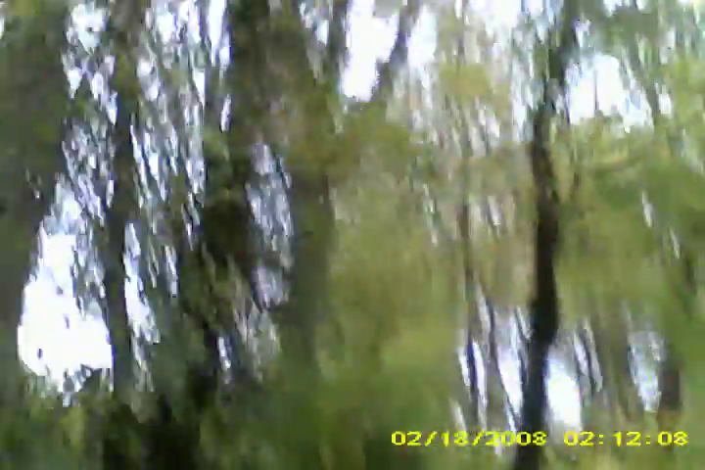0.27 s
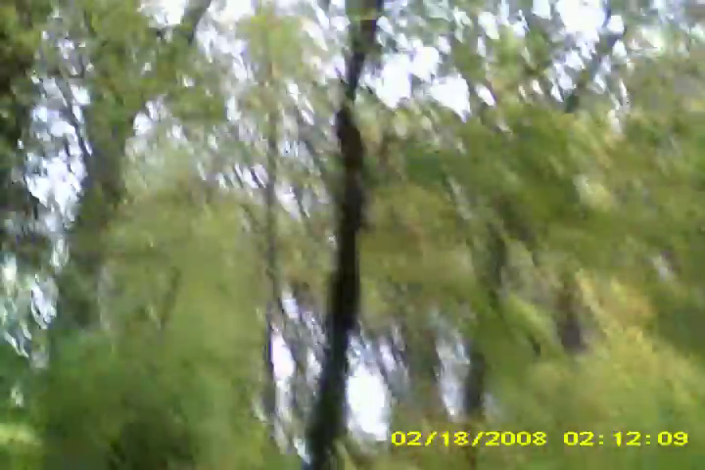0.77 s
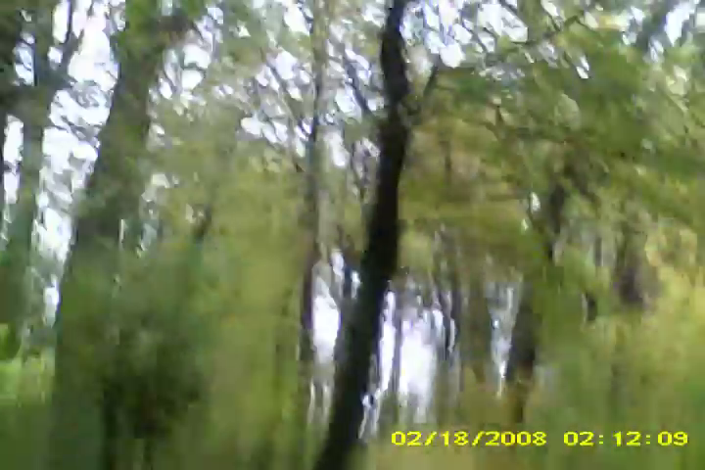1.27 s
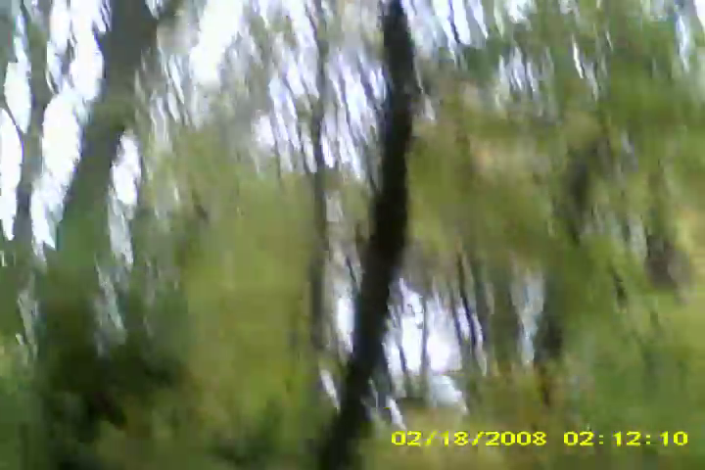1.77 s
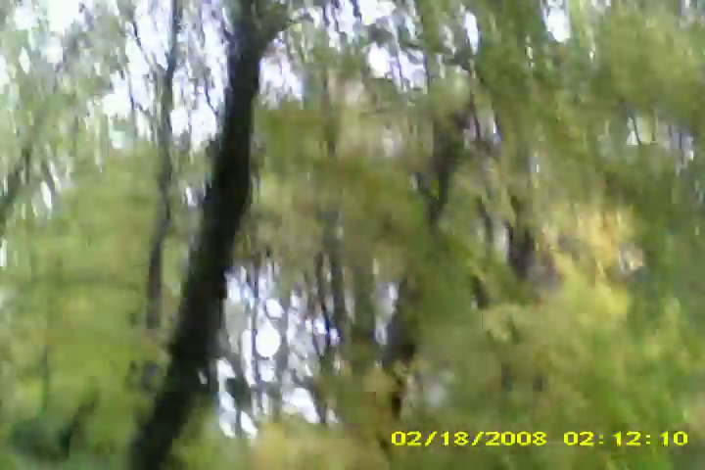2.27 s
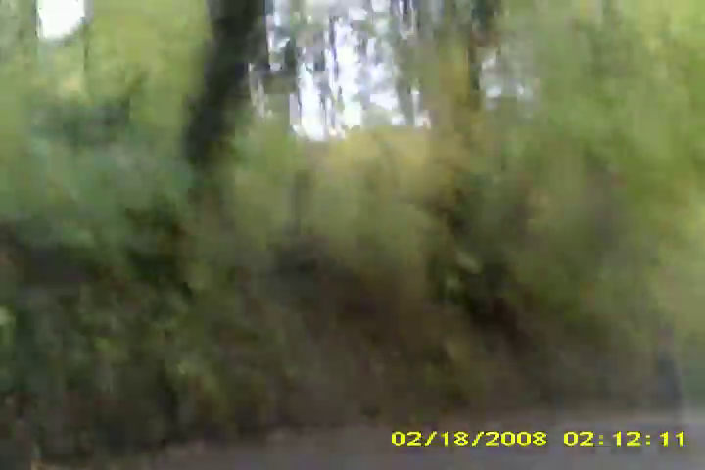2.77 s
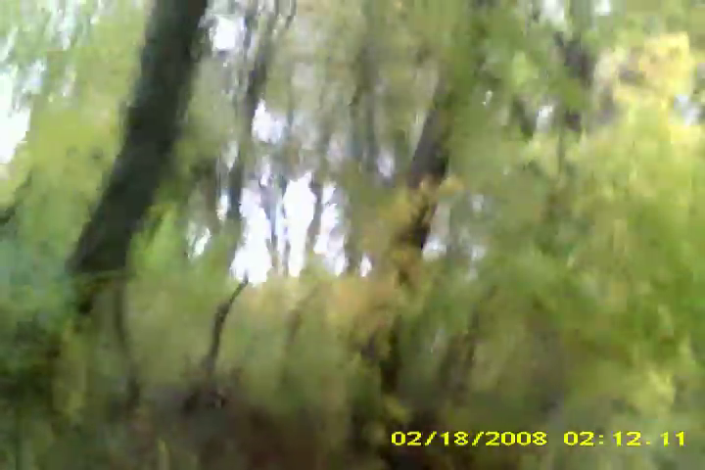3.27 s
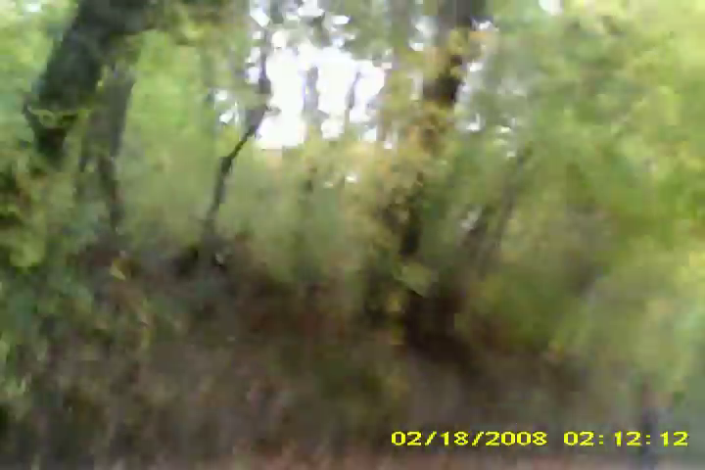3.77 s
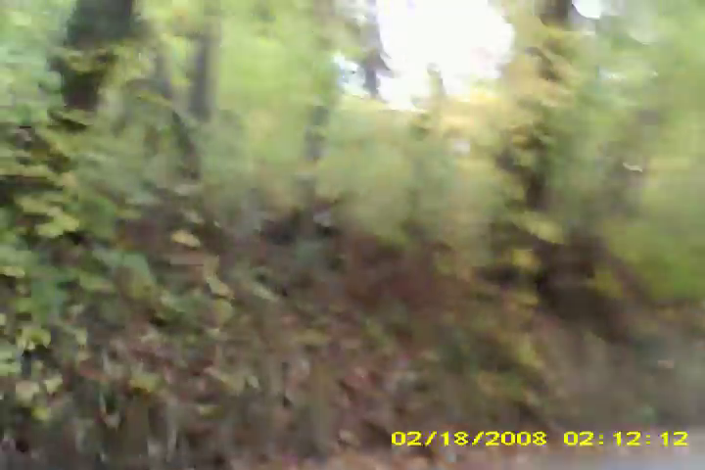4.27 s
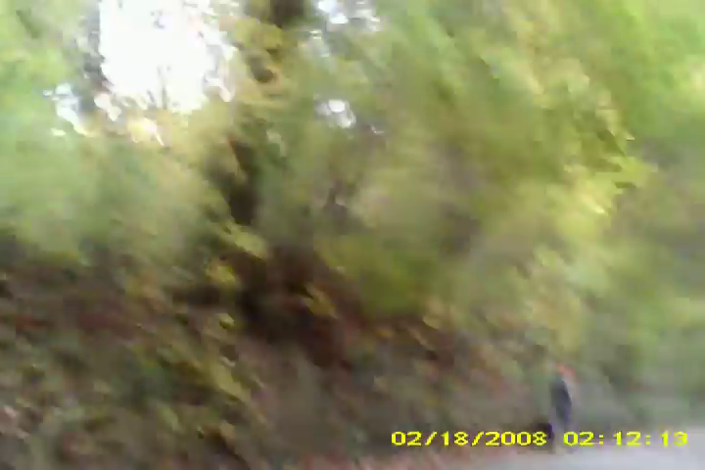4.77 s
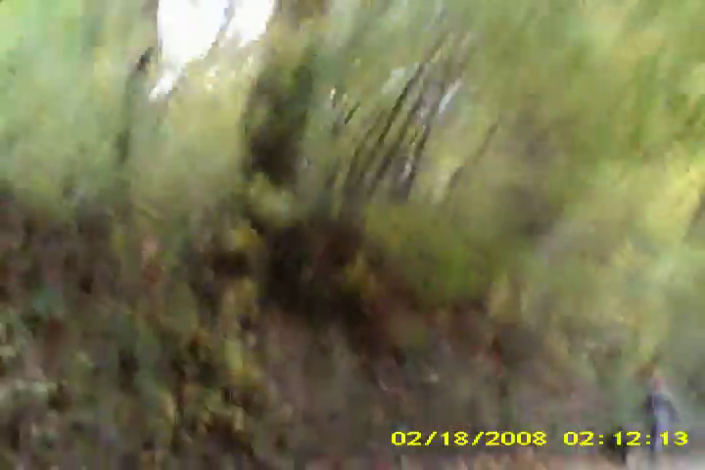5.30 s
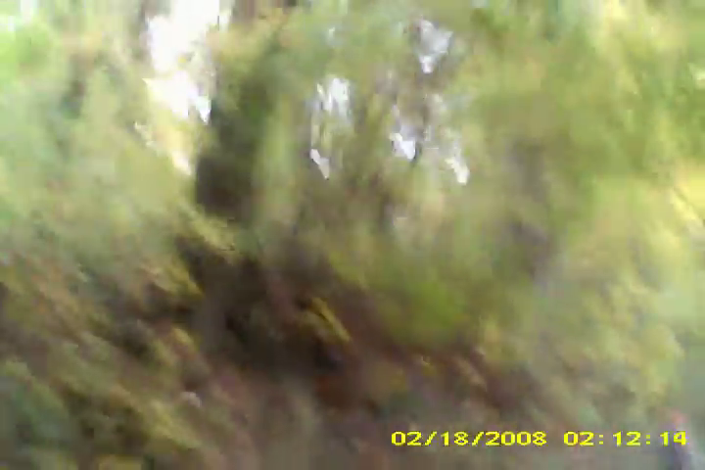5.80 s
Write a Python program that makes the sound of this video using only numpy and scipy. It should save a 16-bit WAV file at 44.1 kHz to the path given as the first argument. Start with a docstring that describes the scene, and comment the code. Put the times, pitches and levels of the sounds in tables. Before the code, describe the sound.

A mountain bike rolls over a bumpy forest path for about six seconds, heard in mono from a small camera fixed to it. Hard, dry plastic knocks start at once and crowd the first half second, ease slightly until 0.8, then return in quick uneven clusters through 1.0 to 1.75. After a thinner moment near 2.1 with ticks and gritty rattling, they are densest from 2.3 to 3.0. From 3.0 to 4.4 blows are sparser, with a pair near 3.7, brief faint brake whines at 3.7 and 4.0, a sharp rattle at 3.9 and tiny metal clinks. Knocks gather again from 4.5, busy around 4.9 to 5.3, then continue scattered to the end. Throughout, loose parts chatter softly, the frame thumps dully, tyres rush with a grainy flutter and wind rumbles low. The knocks are boxy, clipped and close, with little echo.

```python
"""Hard, bright knocks come thick and fast, with ticks, clinks and soft chatter between them.
Under them lie the rush of tyres, brief hums and whines, and the rumble of wind.
A mountain bike rolls down a bumpy forest path with a small camera fixed to it.
The knocks, taps and rattles are short pushes that set decaying sines ringing; the hums are sines.
Tyres and wind are noise in bands, and the camera's housing colours the whole mix."""
import sys
import numpy as np
from scipy import signal
from scipy.io import wavfile

SR = 44100
rng = np.random.default_rng(int(sys.argv[2]) if len(sys.argv) > 2 else 0)


def materialize(psi):
    """Save the field psi as 16-bit PCM at rate SR to the path in sys.argv[1].

    A 1-D psi becomes a single channel; in a 2-D psi each row is a channel.
    """
    bounded = np.clip(np.atleast_2d(psi).T, -1, 1)
    quanta = np.round(bounded * 32767).astype(np.int16)
    wavfile.write(sys.argv[1], SR, quanta)


N = 266364
TIME = np.arange(N) / SR   # seconds
BLOW_S = np.arange(round(.05 * SR)) / SR   # time inside a single blow, in seconds

# Knocks of the plastic mount.
# Each row: start of the main contact in seconds, nominal length in ms, level in dB before the band shares.
MOUNT_KNOCKS = [(0.0192, 6.8, -15.5), (0.0303, 8.7, -11.5), (0.1344, 6.15, -12.5), (0.2334, 7.1, -11.0),
                (0.2575, 1.2, -18.5), (0.3254, 1.68, -7), (0.338, 8, -12), (0.3725, 3.2, -14.5),
                (0.4173, 13.7, -15), (0.4767, 6.65, -13), (0.5, 8.2, -19.5), (0.7096, 5.7, -21),
                (0.7916, 4.5, -17), (0.8621, 5.7, -11), (0.8805, 6.4, -11), (0.9143, 1.8, -12.5),
                (0.9203, 4.4, -15.5), (0.9314, 4.2, -16.5), (0.9543, 3.8, -12), (1.0108, 1.93, -13),
                (1.194, 7.6, -13), (1.2985, 1.2, -11), (1.339, 5.9, -11.5), (1.35, 3.7, -11.5),
                (1.4269, 3.46, -13), (1.4672, 2.6, -15.5), (1.4999, 3.4, -15.5), (1.5639, 4, -12.5),
                (1.589, 3.5, -10.0), (1.602, 11.3, -12.5), (1.665, 2.65, -16), (1.675, 3.6, -10.5),
                (1.6967, 4.4, -14), (1.7452, 7.6, -15), (1.9129, 7.4, -16.5), (1.9259, 6.6, -11.5),
                (1.9806, 6, -13), (1.9933, 8.3, -13), (2.0579, 9.6, -18), (2.3097, 3.9, -11.5),
                (2.3178, 11.5, -12.5), (2.4017, 4.3, -13), (2.414, 5.8, -11), (2.4257, 11.5, -14),
                (2.4645, 11, -16), (2.4907, 2.54, -16.5), (2.498, 2.65, -9.5), (2.5143, 6.5, -14.5),
                (2.572, 1.35, -17), (2.593, 10.3, -12), (2.635, 3.26, -10), (2.6532, 10.6, -12.5),
                (2.7166, 4.3, -19), (2.7723, 8.6, -13), (2.8536, 6.2, -10.3), (2.9004, 6.7, -16),
                (2.9125, 10.9, -13), (2.9943, 3, -13.5), (3.2159, 7.2, -14.5), (3.2622, 2.8, -13),
                (3.667, 6.9, -13.5), (3.6836, 14.3, -12.5), (3.7204, 8.8, -19), (3.746, 7.2, -21.5),
                (4.0284, 3.55, -16.5), (4.0979, 12.7, -13), (4.328, 3.4, -25), (4.4597, 2, -17),
                (4.4838, 11.4, -15.5), (4.582, 4.45, -11.7), (4.8702, 6.1, -19), (4.8797, 3.56, -11.5),
                (4.916, 4.4, -14.5), (4.9591, 2.6, -14.5), (4.9831, 4.7, -14), (4.998, 7.1, -10.5),
                (5.0277, 6.3, -14), (5.13, 5.1, -22), (5.139, 7.86, -12), (5.2175, 8.5, -12.5),
                (5.2847, 4.3, -22), (5.3911, 2.7, -12.5), (5.524, 5.47, -15), (5.702, 7.6, -19.5),
                (5.7138, 7.9, -11.5), (5.7527, 6.9, -13.5), (5.7815, 9.1, -15.5), (5.942, 9.8, -14.5),
                (6.0287, 3.2, -18)]
# Light taps of chain and cables.
# Each row: start of the main contact in seconds, level in dB before the band shares.
CABLE_TICKS = [(0.2932, -18.4), (0.3033, -21), (0.3608, -13), (1.0787, -21), (1.113, -12.5), (1.131, -22.5),
               (1.257, -22), (1.28, -13), (1.32, -17), (1.484, -18.7), (1.5473, -14.5), (1.7812, -16.5),
               (1.8735, -17), (1.946, -19.5), (2.045, -16), (2.193, -19), (2.2159, -19.4), (2.244, -19.0),
               (2.5416, -19.5), (2.9834, -17.5), (3.0259, -12), (3.2873, -25), (3.2976, -24), (3.3366, -22),
               (3.6383, -18), (3.6509, -15), (3.8588, -15), (3.936, -16), (4.2054, -22), (4.4293, -13.5),
               (4.4455, -23), (4.557, -12.7), (4.6076, -21), (4.94, -16), (5.165, -22.5), (5.2641, -21)]
# Small bright clinks of metal. Each row: start in seconds, level in dB that the ring levels are added to.
METAL_CLINKS = [(2.635, -19), (3.3358, -22.5), (3.671, -22), (3.9228, -23), (4.011, -19), (4.187, -31.5),
                (4.341, -36)]
# Roughness of the ground, heard as the chatter of loose parts.
# Each row: time in seconds, roughness in dB (a relative scale).
GROUND_SHAKE = [(0.0, -38.5), (0.37, -32.5), (0.62, -38.5), (1.14, -37), (1.5, -35.5), (1.93, -31.5),
                (2.25, -35), (2.47, -31.5), (3.5, -40.5), (3.9, -30), (4.22, -41), (4.58, -32.5),
                (4.74, -34.5), (5.08, -34.5), (5.5, -33.5), (6.04, -40.5)]
# Gritty bursts of rattling. Each row: middle in seconds, nominal length in ms, relative level in dB.
RATTLE_BURSTS = [(0.4, 41, -30.5), (1.269, 16, -34.5), (1.354, 28, -30), (2.023, 21, -34),
                 (2.115, 9.6, -29.5), (2.435, 17.3, -24), (2.651, 69, -30), (2.764, 42, -40),
                 (2.873, 26, -29), (3.105, 53, -39.5), (3.701, 42, -38), (3.892, 13.3, -23.5),
                 (3.962, 52, -38.5), (4.376, 6.4, -31), (4.506, 27, -30), (4.58, 20, -34),
                 (4.768, 28, -39.5), (4.937, 31, -38), (5.27, 15, -33), (5.339, 17, -31.5),
                 (5.399, 26, -35), (5.659, 33, -31.5)]
# Brief hums of the tyre tread and faint brake whines.
# Each row: middle in seconds, length in seconds, average pitch in Hz, peak level in dB.
HUMS_AND_WHINES = [(1.014, 0.24, 108.4, -40), (2.994, 0.12, 171.5, -35.5), (3.737, 0.045, 1203, -25.5),
                   (3.967, 0.13, 1200, -32.5), (4.254, 0.092, 128.5, -39.5)]
# Strength of the wind on the microphone. Each row: time in seconds, level in dB.
WIND_STRENGTH = [(0, -38), (.4, -37.5), (1.1, -38), (2.4, -39), (3.2, -40.5), (4.5, -42.5), (5.0, -38.5),
                 (6.04, -41.5)]
# Ring of the mount. Each row: central pitch in Hz, relative level in dB,
# nominal time in seconds to fade by 60 dB.
MOUNT_RING = [(333, -42, 0.0021), (626, -17, 0.012), (751, -10, 0.027), (1020, 3.5, 0.015),
              (1305, -2, 0.015), (1716, -2, 0.018), (2010, 0, 0.01), (2743, 2, 0.012), (3144, -0.5, 0.009),
              (3962, 4.5, 0.0083), (4280, -21, 0.019), (5410, -9, 0.013), (6680, -14, 0.013)]
# Ring of the loose parts. Each row: central pitch in Hz, relative level in dB,
# nominal time in seconds to fade by 60 dB.
PARTS_RING = [(1300, -27, 0.0035), (1678, 1.5, 0.014), (1823, 5.5, 0.018), (2087, 7, 0.0091),
              (2596, -7.5, 0.032), (3740, -2.5, 0.014), (3940, 1.5, 0.0064), (5940, -36, 0.0061),
              (6730, -58.5, .010), (9500, -43, .004)]
# Ring of the clinking metal. Each row: pitch in Hz, relative level in dB,
# time in seconds to fade by 60 dB.
METAL_RING = [(6770, -3.5, 0.0045), (7040, -20, 0.015), (9500, -32.5, .007)]
# Tone colour of the tyre rush. Each row: frequency in Hz, relative level in dB per Hz.
TYRE_SPECTRUM = [(110, -6), (220, -8.5), (350, -3.5), (550, -2.5), (1000, -3.5), (1700, -1), (2400, -11),
                 (3300, -24), (4000, -39), (5200, -64), (7200, -40), (10000, -60)]
# Tone colour of the wind. Each row: frequency in Hz, relative level in dB per Hz.
WIND_SPECTRUM = [(20, 11.5), (35, -18.5), (60, -3.5), (120, -5.5), (200, -12.5), (400, -21), (1500, -75)]

LEAD_S = .005   # seconds allowed for the light graze that comes before a blow
CRACK_FROM_HZ = 2585   # the crack lies above this, the clack below
# Thud and clack are steady shares of a knock (dB).
THUD_DB, CLACK_DB = -3.5, -1
# A reference knock: length (ms), level (dB), share of its crack (dB).
KNOCK_MS, KNOCK_DB, CRACK_DB = 5.7, -9.5, -11.0
# Harder knocks crack more: dB per doubling of length, dB per dB of level.
CRACK_DB_PER_DOUBLING, CRACK_DB_PER_DB = 5, 1.53
# Every tap: nominal length (ms), shares of its clack and its crack (dB).
TICK_MS, TICK_CLACK_DB, TICK_CRACK_DB = 3.0, 0, -15
# Thump of the frame: pitch (Hz), fade by 60 dB (s), undamped height under a reference knock (dB).
FRAME_HZ, FRAME_T60_S, FRAME_DB = 85, 0.044, -33.5
JOG_DB = -11   # loose parts jogged by a clink, relative to the clink
CHATTER_DB = -1.5   # chatter relative to the roughness curve
# The camera: housing resonance, its own whine, upper limit of the sound (Hz).
HOUSING_HZ, WHINE_HZ, CUTOFF_HZ = 6580, 7400, 10900


def mount():
    """Hard knocks ring the mount and overload the microphone, which flattens them; harder is brighter."""
    s, ms, level_db = np.transpose(MOUNT_KNOCKS)
    blows = bounces(ms * .85, MOUNT_RING, graze=0.041, rebound=0.5, scatter_db=6.5, detune=0.043, count=11)
    # longer knocks are the harder ones, so they are flattened more
    blows = np.tanh(blows * (1 + 0.014 * ms[:, None]))
    hardness_db = CRACK_DB_PER_DOUBLING * np.log2(ms / KNOCK_MS)
    hardness_db = hardness_db + CRACK_DB_PER_DB * (level_db - KNOCK_DB)
    low_part = cut(cut(blows, 1348, "low", order=4), 204, "high", order=1)
    thud = at_level(low_part, ms, level_db + THUD_DB)
    clack = at_level(clack_of(blows), ms, level_db + CLACK_DB)
    crack = at_level(crack_of(blows), ms, level_db + CRACK_DB + hardness_db)
    return played(s - LEAD_S, thud + clack + crack)


def frame():
    """Each knock shoves the frame, which gives a short, deep thump; long, loud knocks shove most."""
    s, ms, level_db = np.transpose(MOUNT_KNOCKS)
    shove = ms / KNOCK_MS * from_db(level_db - KNOCK_DB + FRAME_DB)
    return ring(played(s, shove[:, None]), FRAME_HZ, FRAME_T60_S)


def ticks():
    """Light taps of chain and cables ring only the loose parts and have no thud."""
    s, level_db = np.transpose(CABLE_TICKS)
    ms = np.full(len(s), TICK_MS)
    blows = bounces(ms * 0.55, PARTS_RING, graze=0.12, rebound=0.35, scatter_db=6.5, detune=0.037, count=5)
    clack = at_level(clack_of(blows), ms, level_db + TICK_CLACK_DB)
    crack = at_level(crack_of(blows), ms, level_db + TICK_CRACK_DB)
    return played(s - LEAD_S, clack + crack)


def clinks():
    """Metal touches metal and jogs the loose parts; every ring gets a strength of its own."""
    s, clink_db = np.transpose(METAL_CLINKS)
    jogged = [(hz, level_db + JOG_DB, t60) for hz, level_db, t60 in PARTS_RING]
    out = np.zeros(N)
    for hz, level_db, t60 in list(METAL_RING) + jogged:
        strength = from_db(clink_db + level_db + rng.normal(0, 3.6, len(s)))
        out += ring(played(s, strength[:, None]), hz, t60)
    return out


def crunches():
    """Now and then the loose parts break into a dense, bright buzz made of many tiny contacts."""
    bursts = sum(from_db(db) * swell(s, ms * 1.08 / 1000) for s, ms, db in RATTLE_BURSTS)
    buzz = grains(2200, PARTS_RING, spread_db=29.5)
    buzz = cut(cut(buzz, 500, "high"), 4640, "low")
    return from_db(8.5) * bursts * buzz


def chatter(shake_db):
    """Loose parts and mount tap softly at random, louder on rough ground."""
    parts_taps = grains(110, PARTS_RING, spread_db=17.5)
    mount_taps = grains(70, MOUNT_RING, spread_db=20.0)
    taps = parts_taps + from_db(-2.0) * mount_taps
    soft = cut(cut(taps, 530, "high"), 2800, "low", order=4)
    return from_db(shake_db + CHATTER_DB) * soft


def tyres(shake_db):
    """Tread rushes over grit as fluttering noise, swelling a little with the roughness of the ground."""
    swell_db = 0.15 * (shake_db - np.mean(shake_db))
    return from_db(-36.5 + swell_db) * banded_noise(TYRE_SPECTRUM, patchy_db=2.5, flutter=70)


def tones():
    """Short hums and whines are sines of wavering pitch that swell and fade."""
    out = np.zeros(N)
    for s, length_s, hz, level_db in HUMS_AND_WHINES:
        pitch = hz * (1 + 0.005 * drift(41))
        tone = np.sin(2 * np.pi * np.cumsum(pitch) / SR)
        out += from_db(level_db) * swell(s, length_s) * tone
    return out


def wind():
    """Air pushing at the microphone port makes a lumpy rumble of low noise."""
    return from_db(in_time(WIND_STRENGTH)) * banded_noise(WIND_SPECTRUM, patchy_db=0.9, flutter=11)


def bounces(length_ms, modes, graze, rebound, scatter_db, detune, count):
    """One row per blow: a light graze, the main contact and rebounds ring the modes; peak 1."""
    blows = len(length_ms)
    length = np.asarray(length_ms) * SR / 1000   # in samples
    share = (np.arange(count) - 1 + rng.random((blows, count))) / (count - 1)
    delay = share * length[:, None]
    force = rebound * rng.choice([-1, 1], (blows, count))
    force *= np.sqrt(length / length.max())[:, None]   # shorter blows rebound less
    # the first contact is the graze, the second is the main one
    delay[:, 0], force[:, 0] = -LEAD_S * SR * rng.random(blows), graze
    delay[:, 1], force[:, 1] = 0, 1
    at = np.clip(LEAD_S * SR + delay, 0, len(BLOW_S) - 1).astype(int)
    freedom = (length / length.mean()) ** 0.19   # short blows also die sooner
    rows = np.arange(blows)[:, None]
    out = np.zeros((blows, len(BLOW_S)))
    for hz, level_db, t60 in modes:
        clicks = np.zeros_like(out)
        strength = from_db(level_db + scatter_db * rng.standard_normal(at.shape))
        np.add.at(clicks, (rows, at), force * strength)
        # the pitch shifts a little with how the parts are seated
        pitches = hz * np.exp(detune * rng.standard_normal(blows))
        out += [ring(row, pitch, t60 * free) for row, pitch, free in zip(clicks, pitches, freedom)]
    return -out / np.abs(out).max(axis=1, keepdims=True)


def clack_of(blows):
    """The middle band of each blow."""
    return cut(blows, [1400, CRACK_FROM_HZ], "band")


def crack_of(blows):
    """The bright top of each blow; the graze before it is too soft to crack."""
    return cut(blows, CRACK_FROM_HZ, "high", order=4) * (BLOW_S >= LEAD_S)


def at_level(blows, length_ms, level_db):
    """Scale each blow so that its energy, spread over its nominal length, has this rms level."""
    power = np.sum(blows ** 2, axis=1) / (length_ms * SR / 1000)
    gain = from_db(level_db) / np.sqrt(np.abs(power) + 1e-20)
    return blows * gain[:, None]


def played(times, blows):
    """Lay the blows out in time."""
    out = np.zeros(N)
    for s, blow in zip(times, blows):
        add(out, s, blow)
    return out


def add(out, s, sound):
    """Mix a sound in at time s."""
    i = max(round(s * SR), 0)
    out[i:i + len(sound)] += sound[:N - i]


def grains(per_s, modes, spread_db):
    """Random contacts of uneven size ring the modes; rms 1."""
    clicks = (rng.random(N) < per_s / SR) * from_db(spread_db * rng.random(N))
    out = np.zeros(N)
    for hz, level_db, t60 in modes:
        # each contact pushes each mode with its own random strength
        out += ring(clicks * rng.standard_normal(N), hz, t60) * from_db(level_db)
    return rms_one(out)


def ring(clicks, hz, t60):
    """A unit click starts a decaying sine, of height 1 before the decay; t60 is its fade by 60 dB."""
    r, w = from_db(-60 / (t60 * SR)), 2 * np.pi * hz / SR
    return signal.lfilter([0, np.sin(w)], [1, -2 * r * np.cos(w), r * r], clicks + 1e-18)


def banded_noise(spectrum, patchy_db, flutter):
    """Half-octave bands of noise, which flutter partly together and partly alone; rms 1."""
    edges = 15 * 2 ** np.arange(0, 10.1, .5)   # Hz
    together = drift(flutter)
    white = rng.standard_normal((2, N))   # neighbouring bands use different noise
    points_hz, points_db = np.transpose(spectrum)
    out = np.zeros(N)
    for k, (low, high) in enumerate(zip(edges, edges[1:])):
        # band middle and table points are both compared as log frequency,
        # so every band reads the level at its own pitch
        level_db = np.interp(np.log(low * high) / 2, np.log(points_hz), points_db)
        level_db = level_db + patchy_db * (together + drift(flutter))
        out += cut(white[k % 2], [low, high], "band") * from_db(level_db)
    return rms_one(out)


def drift(rate):
    """A random wandering curve of rms 1, with this many random points per second."""
    knots = rng.standard_normal(int(rate * N / SR) + 2)
    return rms_one(np.interp(TIME * rate, np.arange(len(knots)), knots))


def swell(middle_s, length_s):
    """A single smooth hump of height 1."""
    return np.cos(np.pi * np.clip((TIME - middle_s) / length_s, -.5, .5))


def in_time(rows):
    """A curve joined by straight lines."""
    return np.interp(TIME, *np.transpose(rows))


def cut(x, hz, kind, order=2):
    """Keep the low, high or middle part of a sound with a Butterworth filter."""
    return signal.sosfilt(signal.butter(order, hz, kind, fs=SR, output="sos"), x)


def from_db(db):
    """Turn decibels into a plain factor."""
    return 10 ** (np.asarray(db) / 20)


def rms_one(x):
    """Scale a signal to rms 1."""
    return x / np.sqrt(np.mean(x ** 2) + 1e-20)


def scene():
    """Mix all the sources, as one channel."""
    shake_db = in_time(GROUND_SHAKE)
    rattles = mount() + frame() + ticks() + clinks() + crunches() + chatter(shake_db)
    background = tyres(shake_db) + tones() + wind()
    return (rattles + background)[None]


def record(dry):
    """The camera adds a housing resonance and a faint whine, rounds off peaks and cuts the top."""
    resonance = signal.lfilter(*signal.iirpeak(HOUSING_HZ, 9.0, fs=SR), dry)
    whine = from_db(-82.0) * np.sin(2 * np.pi * WHINE_HZ * TIME)
    coloured = dry + .5 * resonance + whine
    ceiling = .75   # peaks bend smoothly towards this height
    rounded = coloured / (1 + (coloured / ceiling) ** 6) ** (1 / 6)
    return cut(rounded, CUTOFF_HZ, "low", order=20)


dry = scene()
out = record(dry)
materialize(out)
```